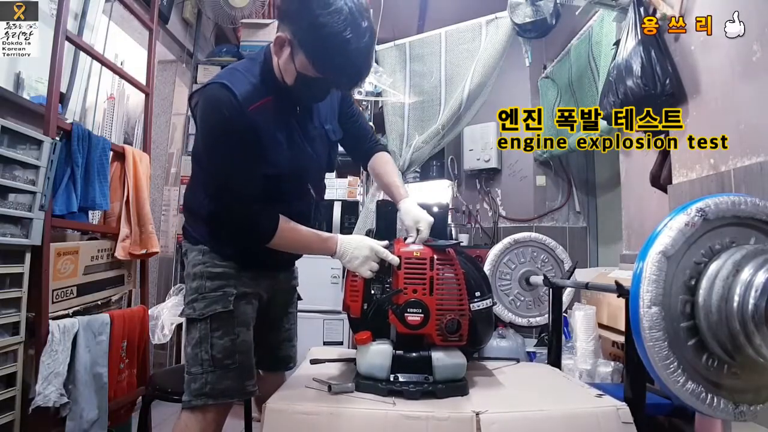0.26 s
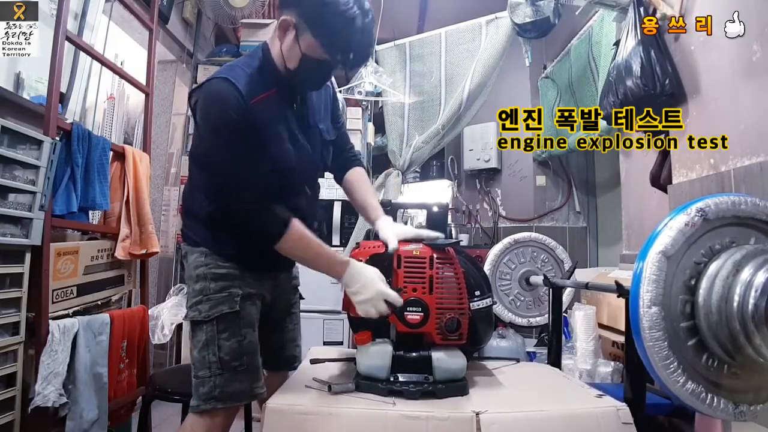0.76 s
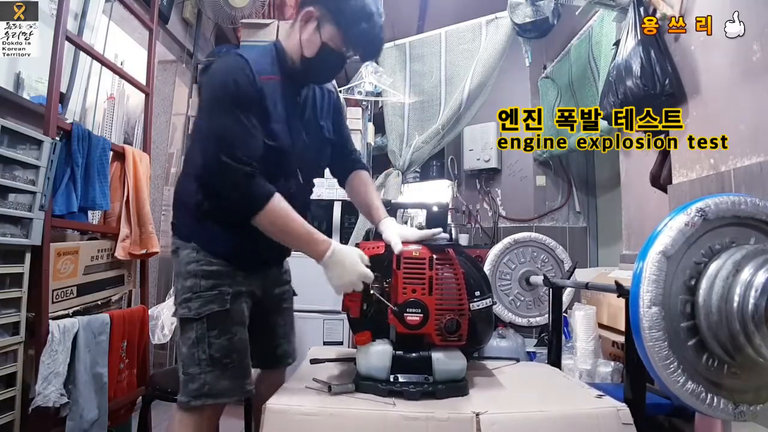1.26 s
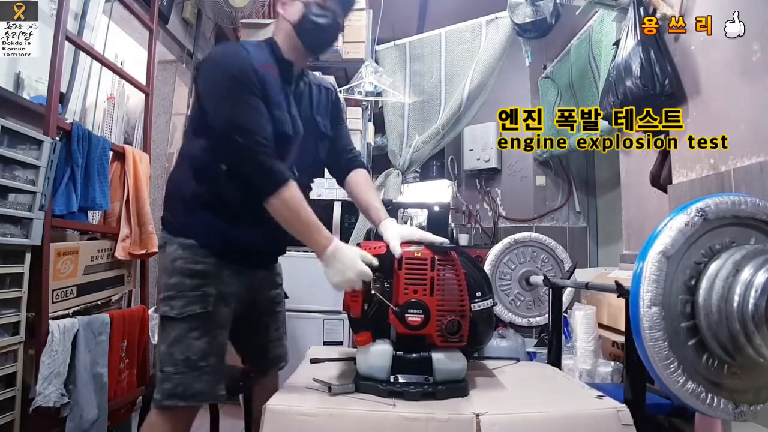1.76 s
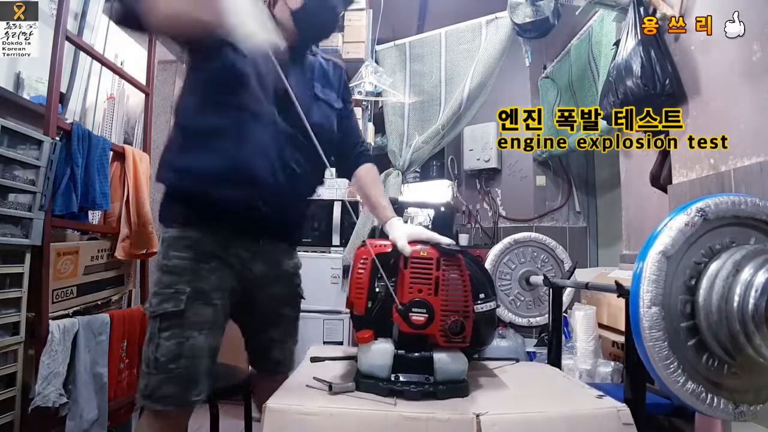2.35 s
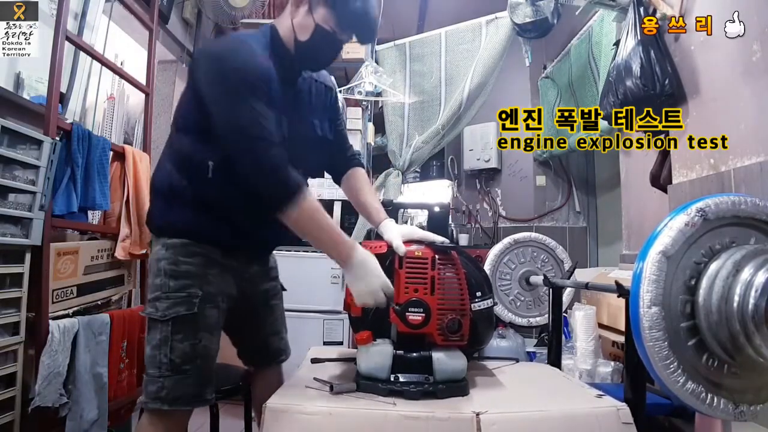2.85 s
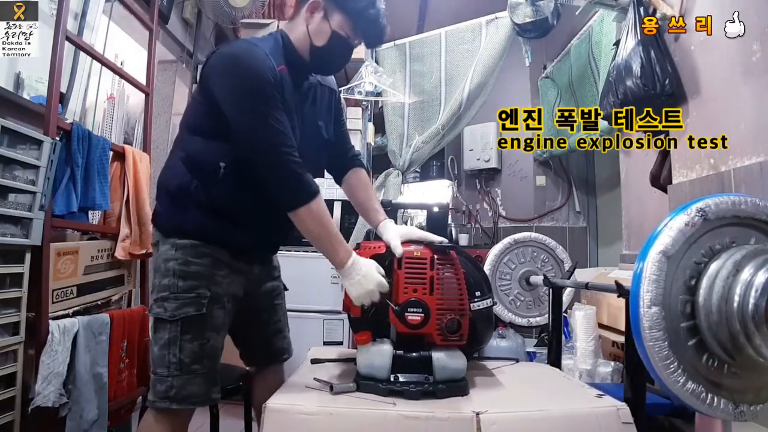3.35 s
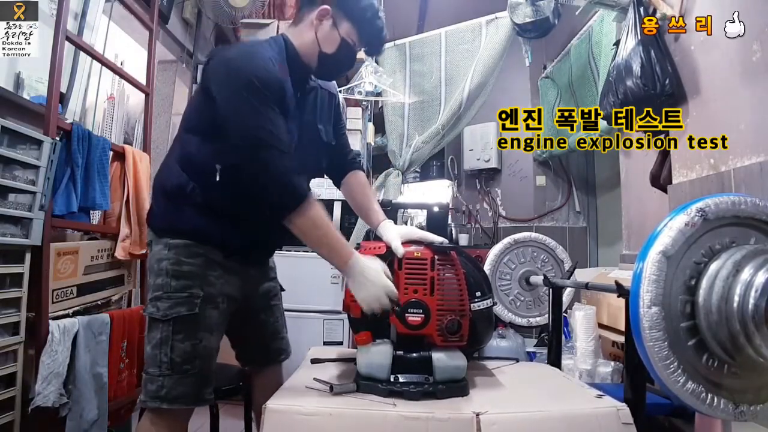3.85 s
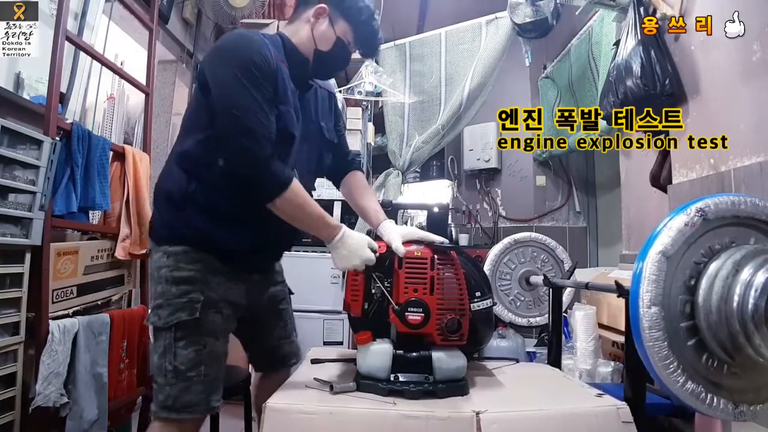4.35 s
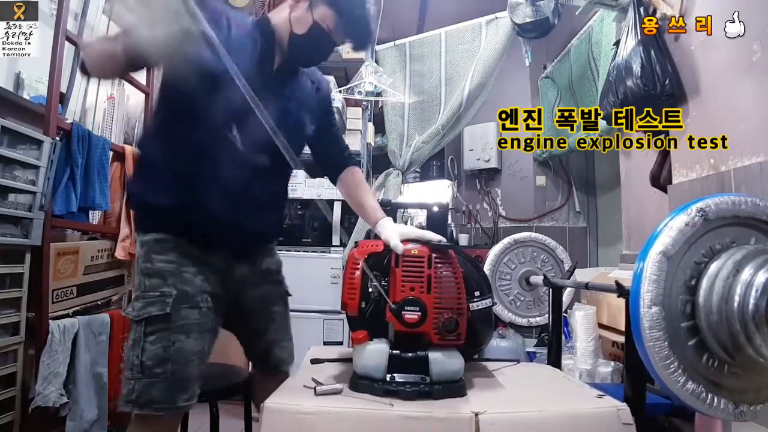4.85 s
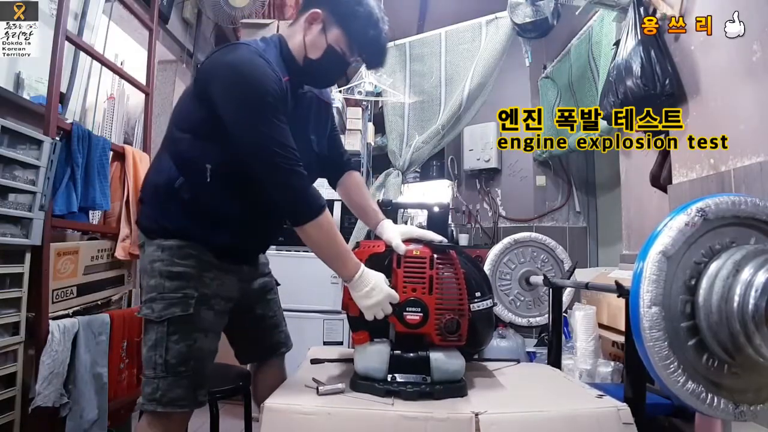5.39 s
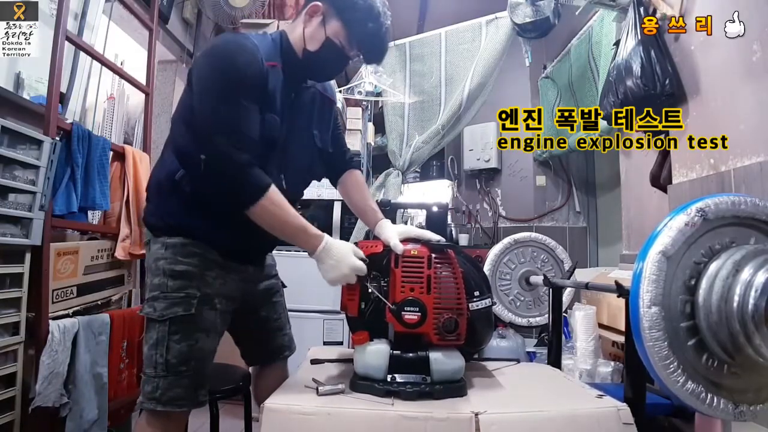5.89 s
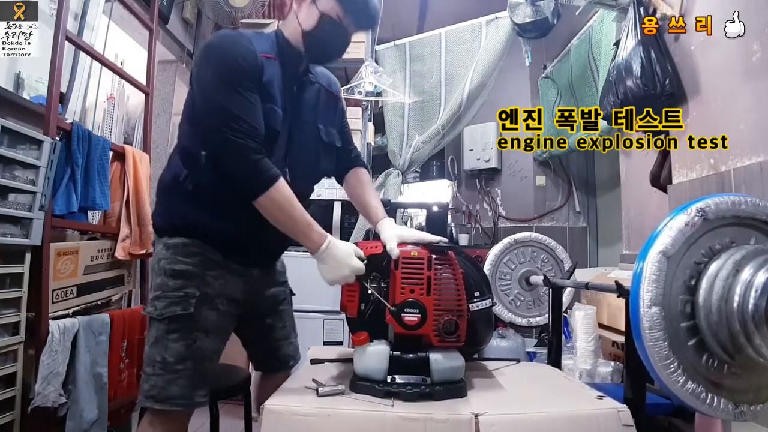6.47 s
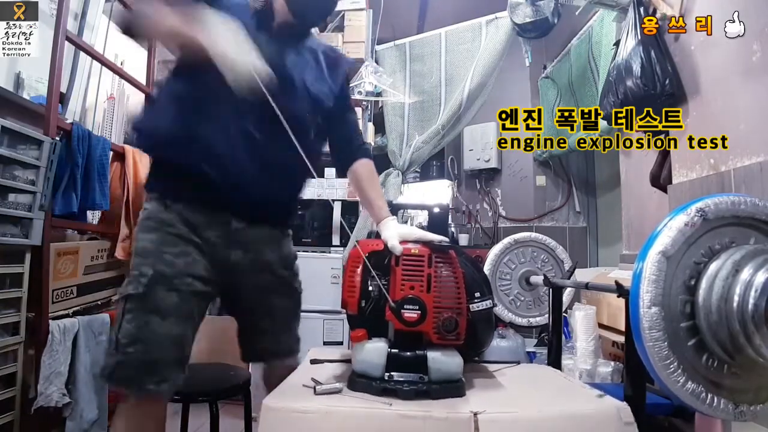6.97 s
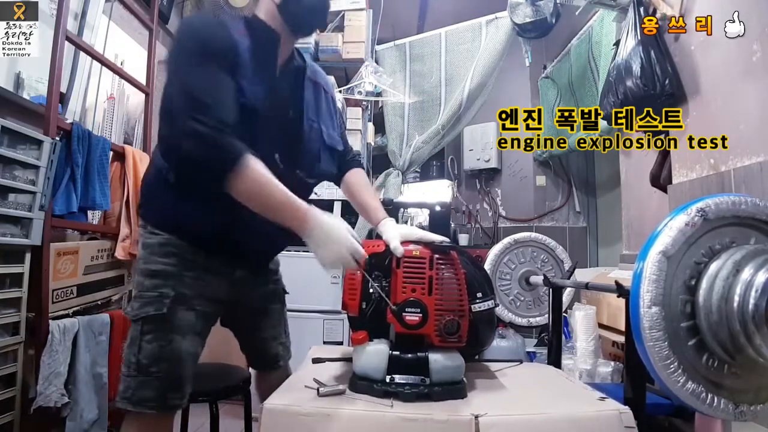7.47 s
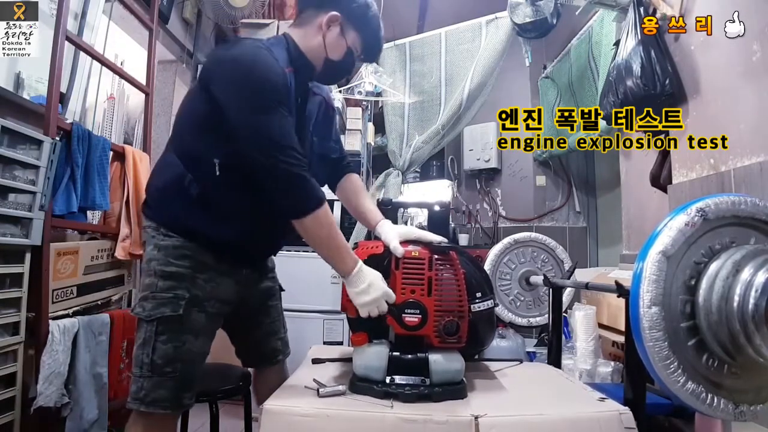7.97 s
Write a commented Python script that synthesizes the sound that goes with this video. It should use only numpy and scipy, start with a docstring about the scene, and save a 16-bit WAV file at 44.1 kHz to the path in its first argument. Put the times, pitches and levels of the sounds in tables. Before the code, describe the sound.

Three rasping pulls on a blower's recoil starter, each with puffing piston strokes that run down, amid clicks and knocks.

```python
"""A two-stroke backpack blower on a workshop bench, close to a stereo microphone and a little to its right.
First a lever snaps over. The cord is drawn taut with clacks of the pawls, then yanked: the piston puffs
twice a turn, the starter whirs and rattles as the flywheel runs down, and the grip knocks home.
Two more pulls follow and the engine never catches. All along, sleeves rustle and a draught now and then
brushes the left microphone port, over a faint mains hum."""
import sys
import numpy as np
from scipy import signal
from scipy.fft import rfft, irfft
from scipy.io import wavfile
from scipy.ndimage import uniform_filter1d

SR = 44100
rng = np.random.default_rng(int(sys.argv[2]) if len(sys.argv) > 2 else 0)


def digitize_waveform(pressure):
    """Quantize a signal to 16-bit integers and store it at the path in sys.argv[1].

    Rows of a 2-D input are taken as channels; values are limited to [-1, 1].
    """
    field = np.atleast_2d(pressure).T
    bounded = np.clip(field, -1, 1)
    quanta = np.round(bounded * 32767).astype(np.int16)
    wavfile.write(sys.argv[1], SR, quanta)


N = 362943
TIME = np.arange(N) / SR

# Crank speed, one list for each pull. Each row: time in seconds, turns per second.
CRANK_SPEEDS = [
    [(2.186, 14.5), (2.256, 20.1), (2.356, 24.4), (2.486, 20.0), (2.666, 13.0), (2.856, 5.7)],
    [(4.487, 16.1), (4.557, 23.4), (4.657, 26.2), (4.787, 21.4), (4.967, 14.25), (5.161, 5.4)],
    [(6.834, 14.5), (6.904, 23.9), (7.004, 27.5), (7.134, 22.0), (7.314, 14.9), (7.471, 5.8)],
]
# Effort of each pull, levels relative. Each row: slack taken up in seconds, its scrape in dB,
# whir in dB, whir hold in seconds, sleeve in dB, puffs in dB, puff fade in dB per second.
PULL_EFFORT = [(1.969, -56, -20.5, 0.19, -36, -8, 31), (4.362, -50, -28, 0.35, -41, -15.5, 13.5),
               (6.721, -40.5, -20, .21, -36.5, -6.5, 29)]
# Resonances. Each row: frequency in Hz, width in Hz, gain in dB.
AIR_BOX_MODES = [(45.3, 39, -6), (76.5, 19, 2), (159.5, 150, -9.5), (234, 94, 1), (285.5, 72, 9.5),
                 (338, 72, 3.5), (438, 41, 3.5), (540, 51, -23), (637, 21, -28.5)]   # air box, muffler and bench
HOUSING_MODES = [(972, 62, 7), (1186, 54, -1), (1970, 150, 5), (2305, 49, 5.5), (2700, 110, -17.5),
                 (3150, 100, -1), (3610, 190, -1.5), (6620, 370, 2), (9700, 690, -4)]   # starter housing
# Pawls, cord and grip striking the starter. Each row: time in seconds, relative level in dB,
# bass in dB, treble in dB, hollow pitch in Hz, click pitch in Hz.
STARTER_BLOWS = [(0.8706, -30, -5, -25, 840, 1230), (0.9775, -25.5, -4.5, -13.5, 970, 3640),
                 (1.0579, -18, -2.5, 1.5, 440, 3620), (1.29, -21.5, -18, -7, 511, 3200),
                 (1.374, -5.5, -9, -8, 990, 1240), (1.3847, -5.5, -19, -5.5, 970, 2260),
                 (1.504, -17, -6.5, -18, 900, 1290), (1.5474, -19.5, -10.5, -12.5, 956, 4150),
                 (1.5889, -19, -13, -11, 439, 2030), (1.6729, -9.5, -6.5, 0.5, 453, 3770),
                 (2.1807, -9.5, -3.5, -21, 476, 1880), (2.433, -5, -30, -9.5, 452, 3580),
                 (2.836, -17.5, -6, -12, 837, 1570), (2.8709, -3.5, -23, -8, 503, 2180),
                 (2.9929, -17.5, -28, -19, 1000, 2320), (3.0992, -20.5, -8, -17, 694, 1400),
                 (3.3197, -28.5, -2.5, -27, 660, 1800), (3.6157, -26, -11, -10, 415, 2400),
                 (3.726, -23, -19, -12.5, 506, 3900), (3.8531, -4.5, -19.5, -6, 483, 2490),
                 (4.0247, -21, -17, -10.5, 966, 1850), (4.0531, -12.5, -9.5, -5.5, 506, 2420),
                 (4.7101, -9, -14, -7, 401, 2140), (5.1403, -17, -5.5, -8, 800, 1473),
                 (5.1663, -13.5, -17, -13, 859, 3000), (5.2125, -2.5, -22.5, -9, 535, 4250),
                 (5.288, -12, -24, -17, 665, 1730), (5.3862, -18.5, -3.5, -16, 710, 1420),
                 (5.575, -18, -7.5, -37, 650, 1340), (5.7024, -23, -6, -16, 473, 2260),
                 (5.77, -16, -5, -5, 543, 1980), (5.9951, -20, -12, -9.5, 970, 1900),
                 (6.0735, -4.5, -11, -15.5, 555, 1270), (6.2457, -23, -7, -12, 463, 3340),
                 (6.3615, -14, -8.5, -3, 567, 3850), (6.8284, -13.5, -9, -20, 353, 3400),
                 (7.4657, -13.5, -8, -11, 820, 1550), (7.5806, -21, -3.5, -11, 665, 3030),
                 (7.6304, -3.5, -17.5, -10, 480, 2840), (7.896, -28.5, -2.5, -25, 673, 1344),
                 (8.1338, -36.5, -1, -17, 480, 4200), (8.1829, -31.5, -6, -20, 440, 1850)]
# The lever's snap and rebounds. Each row: time in seconds, relative level in dB.
LEVER_BLOWS = [(0.0750, 1.5), (0.0756, -10), (0.086, -10.5), (0.0883, -6), (0.099, -7.5)]
# Ringing after a blow. Each row: frequency in Hz, relative level in dB, seconds to fall by 60 dB.
STARTER_RING = [(830, -55, 0.35), (1234, -38, 0.93), (1266, -36.5, 0.81), (1388, -35, 0.66),
                (1480, -40, 0.53), (1631, -41.5, 0.98), (1670, -32, 0.41), (1804, -32, 0.34),
                (1927, -31, 0.46), (2040, -33.5, 0.14), (2256, -16, 0.03), (2720, -27, 0.057)]   # metal cup and flywheel, then the short notes of the grip
LEVER_RING = [(1661, -52, 0.73), (2290, -53.5, 0.35), (3230, -54, .36), (3930, -51, .25), (6640, -43, .22)]
# Sleeves and gloves moving between pulls. Each row: centre in seconds, relative level in dB,
# half-width in seconds, hiss in dB.
SLEEVE_SWISHES = [(0.0, -49.5, 0.11, -59), (1.0, -56.5, 0.074, -55), (1.54, -45, .2, -62),
                  (4.086, -53, 0.12, -66), (5.955, -53.5, 0.48, -66), (6.537, -52.5, 0.089, -45.5)]
# Gusts on the left port. Each row: centre in seconds, level in dB, half-width in seconds.
PORT_GUSTS = [(0.087, -38.5, 0.045), (0.298, -48.5, 0.045), (0.92, -25, 0.027), (1.0, -35.5, 0.042),
              (1.345, -31, 0.049), (2.037, -36.5, 0.084), (5.36, -32.5, 0.037), (5.499, -29.5, 0.021),
              (6.64, -24, 0.041), (7.376, -29, 0.047), (7.594, -32.5, 0.066)]
# Moments when hum and rumble sink away. Each row: centre in seconds, half-width in seconds.
HUM_LULLS = [(3.65, 0.31), (5.954, 0.23), (8.3, .25)]
# Early echoes off the bench and the nearest walls. Each row: delay in seconds, gain in dB.
EARLY_ECHOES = [(.0063, -26), (.0092, -11), (0.0156, -16.5)]
# Tone of each source at the microphone. Each row: frequency in Hz, relative spectral density in dB.
WHIR_SPECTRUM = [(350, -16.5), (600, 1), (737, -6.5), (970, -13), (1310, -6.5), (1850, -7), (2040, -14.5),
                 (2310, -7.5), (2870, -7), (3530, -8.5), (4340, -12.5), (9760, -16.5), (12500, -22.5),
                 (15100, -23), (16000, -16)]
CLACK_SPECTRUM = [(120, -38.5), (200, -11.5), (491, -9), (749, -8.5), (2330, -7.5), (3370, -6.5),
                  (3970, -7), (4350, -9.5), (7010, -13), (7830, -21.5), (8900, -21.5), (10500, -23),
                  (13100, -41.5), (15100, -29), (16000, -41)]
LEVER_SPECTRUM = [(120, -50), (200, -27), (500, -18.5), (883, -21.5), (1000, -22), (2250, -11.5),
                  (3070, -14), (3310, -5.5), (4950, -7), (6880, -0.5), (9580, -9), (10300, -14.5),
                  (16000, -33)]
CLOTH_SPECTRUM = [(200, -1), (450, 6.5), (900, 1.5), (2000, -2), (4000, -12), (6700, -13), (10000, -21.5),
                  (13000, -30.5), (16000, -20.5)]
GUST_SPECTRUM = [(20, -27.5), (50, -13.5), (90, -4), (160, -7.5), (230, -16.5), (400, -28), (1000, -69.5)]
ROOM_SPECTRUM = [(25, -25), (60, -7.5), (125, -16.5), (250, -3.5), (500, -10), (1000, 2.5), (2000, -15),
                 (4000, -43), (7000, -23.5), (12000, -30), (16000, -44)]

COMPRESSION_TURN = .18   # point in each turn where the piston squeezes hardest
YANK_S = 0.052   # how long the whir takes to jump up before the crank turns
CUTOFF_HZ = 15900


def crank_turns():
    """Turns the crank has made since the start of the current pull; zero at rest."""
    turns = np.zeros(N)
    for pull in CRANK_SPEEDS:
        speed = np.interp(TIME, *np.transpose(pull), left=0, right=0)
        turns += np.cumsum(speed) / SR * (speed > 0)
    return turns


def compression(turns):
    """1 where the piston squeezes hardest, -1 half a turn later."""
    return np.cos(2 * np.pi * (turns - COMPRESSION_TURN))


def piston(turns, second_port=.57, puff_db=-25, ring_db=-4, slow_hz=330, fast_hz=620, gush_db=-29):
    """Two cylinder ports open each turn and puff into the air box, sharper at speed, with a rough gush."""
    opens = sum(np.diff(np.ceil(turns - at), prepend=0) > 0 for at in (0, second_port))
    pulses = opens * puff_gain() * from_db(1.2 * rng.standard_normal(N))
    gush = trail(pulses, decay_s=0.015) * rng.standard_normal(N)
    air = pulses + from_db(gush_db) * gush * (turns > 0)
    speed = np.diff(turns, prepend=0) * SR
    haste = np.clip((speed - 12) / 13, 0, 1)
    flow = -band(air * haste, 25, fast_hz) - band(air * (1 - haste), 25, slow_hz)
    chug = from_db(puff_db) * band(flow, 150, 490) + from_db(ring_db) * resonate(flow, AIR_BOX_MODES)
    chug /= band(signal.unit_impulse(2048), 190, 560).max()
    return chug + sum(from_db(db) * np.interp(TIME - delay, TIME, chug) for delay, db in EARLY_ECHOES)


def puff_gain(rise_s=0.067, rise_db=12, stall_s=0.12, stall_db=7):
    """The puffs build just after the yank, weaken as the flywheel runs down and die as it stalls."""
    gain = 0
    for pull, (*_, db, fade) in zip(CRANK_SPEEDS, PULL_EFFORT):
        start, stop = pull[0][0], pull[-1][0]
        top, stall = start + rise_s, stop - stall_s
        late_db = db - fade * (stall - top)
        gain += level([(start - YANK_S, db - rise_db), (top, db),
                       (stall, late_db), (stop, late_db - stall_db)])
    return gain


def whir(turns, grains_per_s=5000, rattles_per_s=120, rattle_db=0.5, throb_db=2.5, flutter_db=1.6):
    """The cord rasps over its guide and the pulley rattles in coarser ticks, a bit harder once a turn."""
    grains = (rng.random(N) < grains_per_s / SR) * from_db(np.minimum(rng.exponential(1, N), 4))
    ticks = (rng.random(N) < rattles_per_s / SR) * rng.uniform(1, 1, N)   # all equally strong
    rattle = trail(ticks, decay_s=0.011)
    contacts = (rms_one(grains) + from_db(rattle_db) * rms_one(rattle)) * rng.standard_normal((3, N))
    direct = from_right(contacts[0], tilt_db=9)
    scattered = from_db(6) * contacts[1:]   # differs at the two microphone ports
    rasp = convolve(direct + scattered, response(WHIR_SPECTRUM))
    rasp = rms_one(band(rasp + resonate(rasp, HOUSING_MODES), 760, 22000))
    flutter = rms_one(band(rng.standard_normal(N), 35, 94))
    return rasp * whir_gain() * from_db(throb_db * compression(turns) + flutter_db * flutter)


def whir_gain(rewind_db=-58):
    """Each pull: a scrape as the slack is taken up, the yank held for an arm's length, a quiet rewind."""
    parts = [from_db(rewind_db) * rewind_gain()]
    for pull, (slack_s, slack_db, db, hold_s, *_) in zip(CRANK_SPEEDS, PULL_EFFORT):
        parts.append(swell(slack_s, slack_db, rise_s=0.023, fade_db_per_s=59))
        parts.append(swell(pull[0][0], db, YANK_S, fade_db_per_s=48, hold_s=hold_s))
    return np.max(parts, axis=0)


def rewind_gain():
    """Once the crank stops, the spring winds the cord back, briskly at first, then dying away."""
    return sum(swell(pull[-1][0], 0, YANK_S, fade_db_per_s=46, hold_s=0.22) for pull in CRANK_SPEEDS)


def clacks(blows, body_db=-6, bass_db=2, treble_db=4.5, light_t60=0.029, heavy_t60=0.038, lead_s=.006):
    """Blows shake the plastic housing in three registers; heavy ones chatter longer and sound the grip."""
    body, out = response(CLACK_SPECTRUM)[:1500], np.zeros(N)
    low, middle, high = (band(body, *hz, order=3) for hz in [(228, 907), (1070, 4800), (6660, 25000)])
    for s, db, bass, treble, hollow_hz, click_hz in blows:
        weight = np.clip((db + 11) / 8, 0, 1)
        t60 = light_t60 + weight * (heavy_t60 - light_t60)
        hollow = (hollow_hz, 130, 7.5)   # pitch in Hz, width in Hz, gain in dB
        click = (click_hz, 300, 8.5 - 9 * weight)
        grip = (2100, 750, 6 - 25 * (1 - weight))
        registers = [(low + resonate(low, [hollow]), bass + bass_db, 1.44 * t60),
                     (middle + resonate(middle, [click, grip]), 0, t60),
                     (high, treble + treble_db, 0.55 * t60)]
        for shape, share_db, decay in registers:
            burst = chatter(db + share_db + body_db, decay, lead_s, lead_db=-40 + 36.3 * weight)
            add(out, s + 0.000994 - lead_s, signal.fftconvolve(burst, shape / np.linalg.norm(shape)))
    return out + ring(blows, STARTER_RING)


def crank_knocks(turns, knock_db=-13, spread_db=1.5, hollow_hz=(400, 715), click_hz=(1720, 3730)):
    """Blows for clacks(): the crank knocks at every compression, harder while the cord is pulled hard."""
    times = TIME[np.diff(np.ceil(turns - COMPRESSION_TURN), prepend=0) > 0]
    low, high = zip((-spread_db, spread_db), hollow_hz, click_hz)
    draws = rng.uniform(low, high, (len(times), 3))
    effort = np.interp(times, TIME, whir_gain())
    levels = knock_db + 0.15 * 20 * np.log10(effort / effort.max() + 1e-6)
    bass_db = treble_db = -9
    return [(s, db + force_db, bass_db, treble_db, hollow, click)
            for s, db, (force_db, hollow, click) in zip(times, levels, draws)]


def pawl_skips(count=4, after_s=.1, gap_s=0.077, slowing=1.25, first_db=-22, loss_db=2.5):
    """Blows for clacks(): pawls skip over the cup during the rewind, ever slower and softer."""
    bass_db, treble_db, hollow_hz, click_hz = -3, -17, 712, 1480
    blows = []
    for pull in CRANK_SPEEDS:
        s = pull[-1][0] + after_s
        for k, stretch in enumerate(rng.uniform(1, 1.1, count)):
            db = first_db - loss_db * k
            blows.append((s, db, bass_db, treble_db, hollow_hz * stretch, click_hz * stretch))
            s += gap_s * slowing ** k * stretch
    return blows


def chatter(db, t60, lead_s, lead_db, size=5000):
    """Loose parts touch ever harder, strike home and buzz out within a few hundredths of a second."""
    t = TIME[:size] - lead_s
    shape_db = np.where(t < 0, lead_db + 9 * t / lead_s, -60 * t / t60)
    return from_db(db + shape_db) * rng.standard_normal(size)


def ring(blows, modes, soft_db=-12):
    """Every blow sets each mode ringing with a strength of its own; light blows barely reach them."""
    t, out = TIME[:SR], np.zeros(N)
    tones = np.array([from_db(db - 60 * t / t60) * np.sin(2 * np.pi * hz * t) for hz, db, t60 in modes])
    for s, db, *_ in blows:
        force_db = db + .5 * min(db - soft_db, 0)
        add(out, s, from_db(force_db + 2 * rng.standard_normal(len(modes))) @ tones)
    return out


def cavity(hollow_db=-25, t60=0.18, band_hz=(1350, 2400), heavy_db=-9):
    """Heavy blows leave the crowded modes of the hollow housing sounding for a moment."""
    t, out = TIME[:SR // 2], np.zeros(N)
    for s, db, *_ in STARTER_BLOWS:
        if db > heavy_db:
            modes = rms_one(band(rng.standard_normal(len(t)), *band_hz))
            add(out, s, from_db(db + hollow_db - 60 * t / t60) * modes)
    return out


def lever(snap_db=-11.5):
    """The lever snaps over and rebounds, with a bright plastic click."""
    snaps = np.zeros(N)
    for s, db in LEVER_BLOWS:
        add(snaps, s - .001, chatter(db + snap_db, t60=0.032, lead_s=0.0014, lead_db=-17))
    return convolve(snaps, response(LEVER_SPECTRUM)) + ring(LEVER_BLOWS, LEVER_RING)


def rattles(handling_db=-10, cranking_db=-5.5, rewind_db=-53):
    """The starter ticks faintly when handled, grittily while it spins and sparsely while it rewinds."""
    handled = from_db(handling_db) * rustle_gain() * loose_ticks(per_s=24)
    cranked = from_db(cranking_db) * whir_gain() * loose_ticks(per_s=63)
    rewound = from_db(rewind_db) * rewind_gain() * loose_ticks(per_s=26)
    return handled + cranked + rewound


def loose_ticks(per_s):
    """Loose pawls and cord tick at random against the housing; rms 1."""
    ticks = (rng.random(N) < per_s / SR) * from_db(1.5 * rng.uniform(-2.3, 1, N))
    buzz = trail(ticks, decay_s=0.0021) * rng.standard_normal(N)
    return rms_one(band(buzz, 2300, 4500) + resonate(buzz, HOUSING_MODES[:7]))


def blow_by(turns, hiss_db=-44, swing_db=14):
    """A thin hiss of squeezed air escapes once a turn."""
    hiss = rms_one(band(rng.standard_normal((2, N)), 6000, 19000))
    return (turns > 0) * hiss * from_db(hiss_db + swing_db * (compression(turns) - 1))


def sleeves(crinkle_db=2, scatter_db=-1):
    """Cloth slides on cloth in uneven swishes, spread wide across the microphone."""
    crinkle = from_db(crinkle_db * rms_one(band(rng.standard_normal(N), 6.9, 40)))
    swish = rng.standard_normal(N) + from_db(scatter_db) * rng.standard_normal((2, N))
    return convolve(swish * crinkle * rustle_gain(), response(CLOTH_SPECTRUM))


def rustle_gain(still_db=-62.5, lift_db=-9, rise_s=0.025, fade_db_per_s=21.5):
    """Cloth moves as the arm takes up the slack and swings, and with small shifts of the hands."""
    arm = 0
    for pull, (slack_s, _, _, _, db, _, _) in zip(CRANK_SPEEDS, PULL_EFFORT):
        yank_s = pull[0][0]
        arm += level([(slack_s - rise_s, still_db), (slack_s, db + lift_db),
                      (yank_s, db), (yank_s + 2, db - 2 * fade_db_per_s)])
    hands = bumps([(s, db, width) for s, db, width, _ in SLEEVE_SWISHES])
    return np.sqrt(from_db(still_db) ** 2 + arm ** 2 + hands ** 2)


def sleeve_hiss():
    """Smooth cloth adds a bright hiss to some of the swishes."""
    hiss = rms_one(band(rng.standard_normal((2, N)), 4500, 9000, order=1))
    return hiss * bumps([(s, hiss_db, width) for s, _, width, hiss_db in SLEEVE_SWISHES])


def draught(right_db=-26):
    """Lumps of moving air press on the left microphone port and barely reach the right one."""
    eddies = convolve(rng.standard_normal(N), response(GUST_SPECTRUM))[0]
    eddies /= np.sqrt(uniform_filter1d(eddies ** 2, size=1500) + 1e-9)
    return bumps(PORT_GUSTS) * eddies * from_db([[0], [right_db]])


def room_tone(air_db=-60, hum_hz=120, hum_db=-57, dip_db=-25):
    """Soft workshop air all round, with a mains hum and a low rumble that sink away at times."""
    noise = rng.standard_normal(N) + 0.9 * rng.standard_normal((2, N))
    air = rms_one(convolve(noise, response(ROOM_SPECTRUM)))
    hum = np.sin(2 * np.pi * hum_hz * TIME)
    rumble = from_db(-5) * rms_one(band(rng.standard_normal(N), 40, 130))
    dips = bumps([(s, 0, width) for s, width in HUM_LULLS])
    return from_db(air_db) * air + from_db(hum_db + dip_db * dips) * (hum + rumble)


def workshop(x, near_db, far_db, near_t60=0.11, far_t60=0.3, alike_hz=750):
    """Dense echoes from nearby bench and shelves, then a short dull tail; their bass is centred."""
    t = TIME[:SR * 2 // 3]
    white = rng.standard_normal((3, len(t)))
    diffuse = band(white[2], 36, alike_hz) + band(white[:2], alike_hz, 21000)
    near = diffuse * from_db(-60 * t / near_t60) * (t > .002)
    far = band(diffuse[:, ::-1], 60, 4900, order=1) * from_db(-60 * t / far_t60) * (t > .012)
    echoes = sum(from_db(db) * h / np.linalg.norm(h[0]) for db, h in [(near_db, near), (far_db, far)])
    return x + convolve(x, echoes)


def from_right(x, tilt_db, lag_samples=2):
    """The blower stands a little to the right: the left port hears it later and softer."""
    x = np.ravel(x)
    return np.array([np.roll(x, lag_samples), x]) * from_db([[-tilt_db / 2], [tilt_db / 2]])


def level(rows):
    """Gain over time, silent outside the rows. Each row: time in seconds, level in dB."""
    coarse = TIME[::32]
    db = np.interp(coarse, *np.transpose(rows), left=-np.inf, right=-np.inf)
    return np.interp(TIME, coarse, from_db(db))


def swell(s, db, rise_s, fade_db_per_s, hold_s=0):
    """Gain over time: rises until s, holds, then fades at a steady rate."""
    release = s + hold_s
    return level([(s - rise_s, db - 40), (s, db), (release, db), (release + 2, db - 2 * fade_db_per_s)])


def bumps(rows):
    """Bell-shaped swells of gain. Each row: centre in seconds, level in dB, half-width in seconds."""
    coarse = TIME[::32]
    gain = sum(from_db(db) * np.exp(-.5 * ((coarse - s) / width) ** 2) for s, db, width in rows)
    return np.interp(TIME, coarse, gain)


def response(spectrum, size=4096):
    """Causal impulse response of unit energy with the given spectrum."""
    hz, db = np.transpose(spectrum)
    log_hz = np.log(np.fft.rfftfreq(size, 1 / SR) + 1)
    log_gain = np.log(from_db(np.interp(log_hz, np.log(hz), db)))
    cepstrum = irfft(log_gain) * np.r_[1, np.full(size // 2 - 1, 2), np.zeros(size // 2)]
    impulse = irfft(np.exp(rfft(cepstrum)))
    return impulse / np.linalg.norm(impulse)


def resonate(x, modes):
    """Parallel resonances. Each row: frequency in Hz, width in Hz, gain in dB."""
    return sum(from_db(db) * signal.lfilter(*signal.iirpeak(hz, hz / width, SR), x + 1e-18)
               for hz, width, db in modes)


def trail(pulses, decay_s):
    """Gives each pulse an exponential tail."""
    return signal.lfilter([1], [1, -np.exp(-1 / (decay_s * SR))], pulses + 1e-18)


def band(x, low_hz, high_hz, order=2):
    sections = signal.butter(order, [low_hz, min(high_hz, .45 * SR)], "band", fs=SR, output="sos")
    return signal.sosfilt(sections, x + 1e-18)


def convolve(x, impulse):
    return signal.fftconvolve(np.atleast_2d(x), np.atleast_2d(impulse), axes=-1)[:, :N]


def add(out, s, sound):
    """Mixes a sound in at s seconds."""
    part = out[int(s * SR):][:len(sound)]
    part += sound[:len(part)]


def from_db(db):
    return 10 ** (np.asarray(db) / 20)


def rms_one(x):
    return x / np.sqrt(np.mean(x ** 2) + 1e-20)


def scene():
    """The blower close by on its bench, the sleeves of the person pulling, the air at the microphone."""
    turns = crank_turns()
    engine = workshop(from_right(piston(turns), tilt_db=0.5), near_db=-27, far_db=-13.5)
    starter = workshop(whir(turns) + blow_by(turns), near_db=-5, far_db=-10.5)
    blows = STARTER_BLOWS + crank_knocks(turns) + pawl_skips()
    housing = clacks(blows) + cavity() + rattles()
    knocks = workshop(from_right(housing, tilt_db=2), near_db=-0.5, far_db=-14)
    snap = workshop(from_right(lever(), tilt_db=3.5, lag_samples=1), near_db=4, far_db=-9)
    cloth = from_db(2.5) * sleeves() + sleeve_hiss()
    return engine + starter + knocks + snap + cloth + draught() + room_tone()


def record(dry):
    """The loudest peaks flatten at full scale, and the highest treble is cut."""
    lowpass = signal.ellip(10, .2, 70, CUTOFF_HZ, fs=SR, output="sos")
    return signal.sosfilt(lowpass, np.clip(dry, -1, 1))


dry = scene()
out = record(dry)
digitize_waveform(out)
```